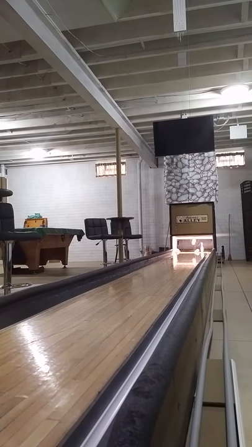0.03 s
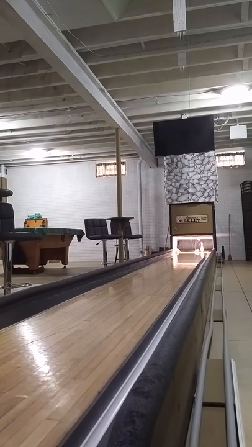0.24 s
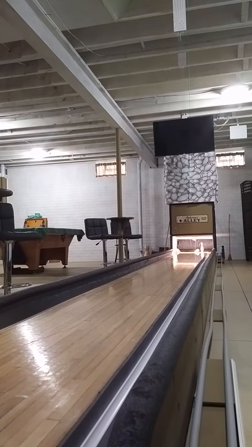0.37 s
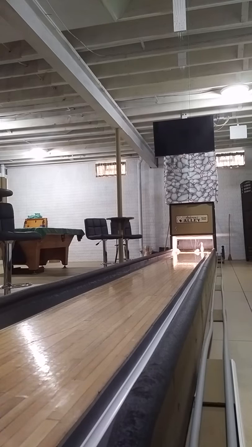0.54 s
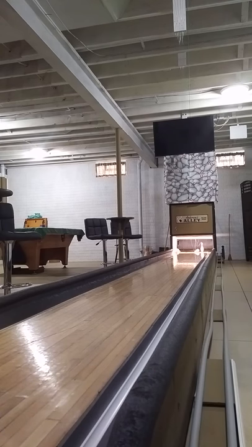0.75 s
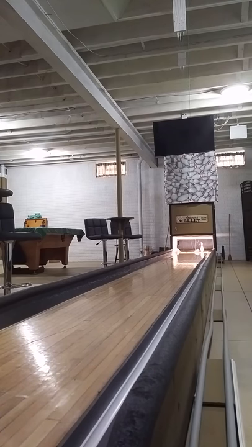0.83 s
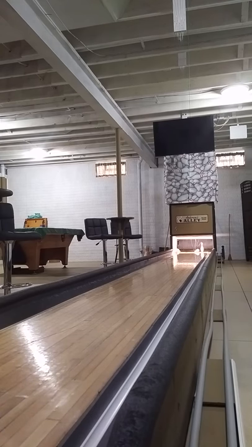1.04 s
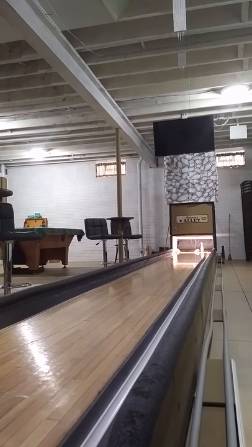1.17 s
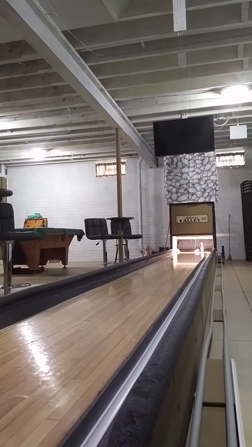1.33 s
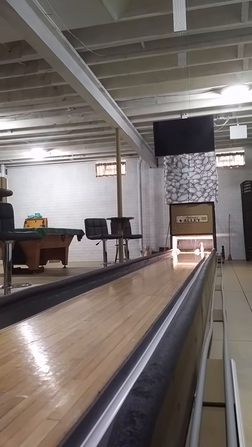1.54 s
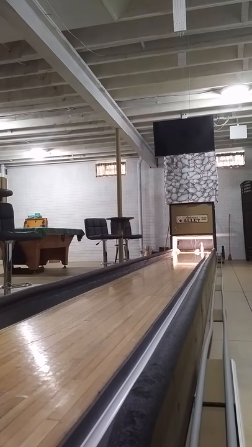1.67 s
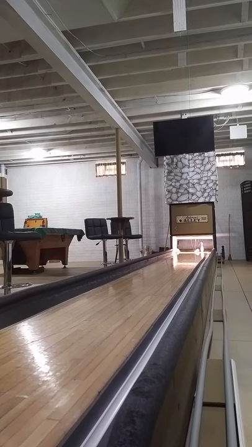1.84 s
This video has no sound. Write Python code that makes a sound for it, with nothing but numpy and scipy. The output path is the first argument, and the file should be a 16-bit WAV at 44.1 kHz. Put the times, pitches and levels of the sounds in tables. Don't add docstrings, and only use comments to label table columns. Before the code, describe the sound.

Wooden bowling pins clatter and thud on a hollow deck at the far end of a basement lane

```python
import sys
import numpy as np
from scipy import signal
from scipy.fft import rfft, irfft
from scipy.io import wavfile
from scipy.ndimage import uniform_filter1d

SR = 44100
rng = np.random.default_rng(int(sys.argv[2]) if len(sys.argv) > 2 else 0)


def attenuation_scalar(level_db):
    decades = np.asarray(level_db, float) / 20
    return 10 ** decades


def generate_wav(signal):
    frames = np.transpose(np.atleast_2d(signal))
    scaled = np.clip(frames, -1, 1) * 32767
    pcm = np.round(scaled).astype(np.int16)
    wavfile.write(sys.argv[1], SR, pcm)


N = 83790


def read(points, hz):
    f, value = np.transpose(points)
    return np.interp(np.log(hz + 1), np.log(f + 1), value)


def evened(x):
    return x / np.sqrt(np.mean(x ** 2) + 1e-30)


def resonate(x, hz, width_hz):
    r = np.exp(-np.pi * abs(width_hz) / SR)
    feedback = [1, -2 * r * np.cos(2 * np.pi * hz / SR), r * r]
    return signal.lfilter([(1 - r * r) / 2, 0, (r * r - 1) / 2], feedback, x)


def causal(log_gain):
    return np.exp(log_gain - 1j * signal.hilbert(log_gain).imag)


def body(colour, modes=()):
    ring_db = 3
    low_skirt, high_skirt = (colour[0][0] / 4, -100), (colour[-1][0] * 4, -100)
    points = [low_skirt] + list(colour) + [high_skirt]
    log_gain = np.log(attenuation_scalar(read(points, abs(np.fft.fftfreq(16384, 1 / SR)))))
    fade = np.cos(np.linspace(0, np.pi / 2, 8192))
    thump = np.fft.ifft(causal(log_gain)).real[:8192] * fade ** 2
    thump = np.pad(thump, (0, 16384))
    taps = thump + sum(attenuation_scalar(db + ring_db) * resonate(thump, hz, width) for hz, width, db in modes)
    taps = taps * np.cos(np.linspace(0, np.pi / 2, len(taps)))
    return taps / np.linalg.norm(taps)


def blows(start_s, level_db, clatter_s):
    rebound_energy = 0.12
    out, t = np.zeros(N + 4000), np.arange(4000) / SR
    for s, db in zip(start_s, level_db):
        burst = rng.standard_normal(len(t)) * np.exp(-t / clatter_s)
        burst *= rng.random(len(t)) < 0.1
        burst *= np.sqrt(rebound_energy) / np.linalg.norm(burst)
        burst[0] = 1
        out[round(s * SR):][:len(t)] += attenuation_scalar(db) * burst
    return out[:N]


def floor():
    # hz, level_db
    air_colour = [(30, -46), (55, 2.5), (300, 3.5), (1200, -8.5), (2900, -14), (8000, -23.5), (12000, -21),
                  (15500, -20.5)]
    # hz, level_db
    old_colour = [(150, -27), (300, -8), (2000, -3), (4500, -12.5), (9000, -24)]
    hz, t = np.fft.rfftfreq(N, 1 / SR), np.arange(N) / SR

    def coloured(points):
        return evened(irfft(rfft(rng.standard_normal(N)) * attenuation_scalar(read(points, hz)), N))

    air = attenuation_scalar(-63.5) * coloured(air_colour)
    old = attenuation_scalar(-66.5 - 28 * t) * coloured(old_colour)
    whine = attenuation_scalar(-78.5) * np.sqrt(2) * np.sin(2 * np.pi * 13038 * t)
    quiet = air + old + whine
    return quiet + attenuation_scalar(10.5) * resonate(quiet, 6320, 1000)


def room():
    # hz, t60_s
    fall = [(60, 0.74), (160, 0.81), (420, 0.61), (1100, 0.73), (2900, 0.44), (7000, 0.32), (13000, 0.18)]
    # hz, rise_s
    rise = [(60, 0.011), (300, 0.011), (600, 0.014), (1200, 0.0032), (4000, 0.0089), (12000, 0.0088)]
    length, even_hz, direct_db = SR * 2, 12, -14.5
    noise, hz, t = rfft(rng.standard_normal(length)), np.fft.rfftfreq(length, 1 / SR), np.arange(length) / SR
    tail = np.zeros(length)
    for centre in 31.25 * 2. ** np.arange(10):
        band = irfft(noise * np.maximum(1 - abs(np.log2((hz + 1) / centre)), 0))
        shape = (1 - np.exp(-t / abs(read(rise, centre)))) * attenuation_scalar(-60 * t / read(fall, centre))
        tail += band * shape / np.linalg.norm(shape)
    spectrum = np.fft.fft(tail)
    power = uniform_filter1d(abs(spectrum) ** 2, size=even_hz * 2, mode="wrap")
    out = np.fft.ifft(spectrum * causal(-np.log(power + 1e-9) / 2)).real
    out[0] += attenuation_scalar(direct_db)
    return out


def down_the_lane(force, taps):
    sound = signal.fftconvolve(force, taps)[:N]
    return signal.fftconvolve(sound, room())[:N]


def deck(roll):
    # start_s, thud_db, boom_db, slap_db
    landings = [(0.136, -44.5, -54, -53), (0.16, -57, -51, -48), (0.2, -22.5, -33.5, -34.5),
                (0.234, -38, -47, -42), (0.26, -46, -56, -47), (0.353, -41, -63, -51),
                (0.4443, -17, -25, -26), (0.473, -21, -28, -31.5), (0.51, -27, -40, -31.5),
                (0.596, -16.5, -25.5, -33), (0.631, -33, -39, -46), (0.699, -25, -38, -35),
                (0.793, -33, -42, -39.5), (0.864, -27, -34.5, -46), (0.936, -23.5, -31, -38),
                (0.999, -28, -32.5, -37.5), (1.059, -21.5, -41, -42.5), (1.103, -37, -33.5, -41.5),
                (1.141, -23, -47, -41.5), (1.206, -21.5, -31, -35.5), (1.282, -25.5, -35, -33.5),
                (1.328, -41, -47, -36), (1.389, -46, -53, -51.5), (1.46, -42, -47, -51),
                (1.541, -47, -49, -53.5), (1.845, -46.5, -69, -61)]
    # hz, level_db
    thud_colour = [(110, -41), (170, -17.5), (210, -1.5), (310, 4), (400, 3), (700, -27.5)]
    boom_colour = [(40, -13), (80, 4.5), (130, 9.5), (160, 5), (230, -35)]
    slap_colour = [(250, -31), (430, -2.5), (650, 4.5), (850, -6.5), (1600, -37.5)]
    # pitch_hz, width_hz, level_db
    panel_modes = [(217.6, 50, 5), (252, 38, -3.5), (305.2, 13.3, 3.5), (340, 38, -5), (375, 25, -3.5)]
    hollow_modes = [(96, 28, -16), (121, 3.7, -5), (137, 26, -12.5)]
    board_modes = [(463.4, 32, 7.5), (526, 19, 3), (629, 19.5, -6.5), (754, 19, -1.5)]
    start_s, thud_db, boom_db, slap_db = np.transpose(landings)
    thud = attenuation_scalar(22) * blows(start_s, thud_db, clatter_s=0.0057) + roll
    boom = attenuation_scalar(24.5) * blows(start_s, boom_db, clatter_s=0.0028) + attenuation_scalar(-13) * roll
    slap = attenuation_scalar(30) * blows(start_s, slap_db, clatter_s=0.0023) + attenuation_scalar(-3.5) * roll
    return (down_the_lane(thud, body(thud_colour, panel_modes))
            + down_the_lane(boom, body(boom_colour, hollow_modes))
            + down_the_lane(slap, body(slap_colour, board_modes)))


def pins(roll):
    # start_s, crack_db, knock_db
    clacks = [(0.14, -79, -47.5), (0.152, -68, -48.5), (0.1623, -70, -66), (0.2011, -28, -28),
              (0.222, -34.5, -34.5), (0.245, -38.5, -37), (0.4452, -26.5, -28), (0.474, -30.5, -27.5),
              (0.498, -38, -32), (0.5462, -24.5, -27), (0.5742, -27.5, -30), (0.599, -31, -28.5),
              (0.6491, -36, -35.5), (0.7401, -38, -41.5), (0.8196, -46.5, -75), (0.8994, -46, -46),
              (1.0248, -41.5, -42.5), (1.116, -49, -44), (1.196, -43, -39), (1.2697, -41, -34.5),
              (1.2874, -33, -34), (1.3498, -46, -55), (1.3891, -60, -42)]
    # hz, level_db
    crack_colour = [(900, -34), (1800, -8), (2560, -7.5), (5160, -9), (6300, -4.5), (7600, -17),
                    (10000, -29), (15500, -51)]
    knock_colour = [(250, -17.5), (600, -10.5), (1000, -3), (1600, -9), (2500, -20.5), (5000, -26.5)]
    # pitch_hz, width_hz, level_db
    pin_modes = [(826, 12.5, 2.5), (997, 6.7, -10.5), (1080.4, 55, -6), (1476, 6.7, -24), (1715, 22, -12.5),
                 (2030, 33, 1.5)]
    clatter_s = 0.0089
    start_s, crack_db, knock_db = np.transpose(clacks)
    crack = attenuation_scalar(22) * blows(start_s, crack_db, clatter_s) + attenuation_scalar(-11.5) * roll
    knock = attenuation_scalar(26.5) * blows(start_s, knock_db, clatter_s) + attenuation_scalar(-7) * roll
    return down_the_lane(crack, body(crack_colour)) + down_the_lane(knock, body(knock_colour, pin_modes))


def ticks():
    # start_s, level_db, centre_hz, width_hz
    near = [(0.548, -8.5, 1550, 500), (1.627, -57, 4040, 4910), (1.633, -47, 2805, 3000),
            (1.636, -54, 5500, 4000), (1.643, -58, 3500, 4000), (1.746, -53, 12540, 4940),
            (1.751, -52, 14100, 5310), (1.75, -52, 6470, 2500), (1.795, -49, 2537, 1210),
            (0.446, -39, 9400, 4000), (0.452, -24, 6000, 2000), (0.46, -41, 10000, 4000),
            (0.143, -37, 1750, 400), (0.165, -38, 1400, 600), (1.3, -30, 900, 500), (1.32, -36, 3000, 1990)]
    out, t = np.zeros(N + 2000), np.arange(2000) / SR
    for s, db, hz, width in near:
        puff = rng.standard_normal(len(t)) * np.exp(-t / 0.0033)
        puff = resonate(resonate(puff, hz, width), hz, width)
        out[round(s * SR):][:len(t)] += attenuation_scalar(db) * puff
    return out[:N]


def panel():
    # start_s, level_db
    strength = [(0.2, -45), (0.242, -26), (0.366, -42.5), (0.446, -42), (0.496, -26.5), (0.567, -38),
                (0.634, -23), (0.727, -30), (0.764, -45.5), (0.817, -28), (0.868, -61), (0.948, -27.5),
                (0.974, -47.5), (1.17, -31), (1.246, -40.5), (1.345, -25), (1.398, -51), (1.5, -63)]
    pitch_hz, pitch_waver_hz, level_db, level_waver_db = 304.1, 8.68, -4.5, -2.5
    s, db = np.transpose(strength)
    t = np.arange(N) / SR
    slow = signal.butter(2, [8, 40], "band", fs=SR, output="sos")
    waver = signal.sosfiltfilt(slow, rng.standard_normal((2, N)))
    course_db = np.interp(t, [s[0] - 0.004, *s, s[-1] + 0.25], [-90, *db, -80], -120, -120)
    level = attenuation_scalar(course_db + level_db + level_waver_db * evened(waver[0]))
    cycles = np.cumsum(pitch_hz + pitch_waver_hz * evened(waver[1])) / SR
    return np.sqrt(2) * level * np.sin(2 * np.pi * cycles)


def rings():
    # start_s, pitch_hz, level_db
    tones = [(0.202, 1087, -36.5), (.202, 709, -39), (.225, 150.7, -39), (.23, 470.3, -38),
             (.265, 167, -44), (.203, 1360, -42), (.209, 1000, -37), (.209, 842, -46.5), (.239, 625, -36.5),
             (.245, 1425, -41), (.297, 1065, -47), (.3, 653, -43.5), (.35, 621, -48.5), (0.466, 143, -34),
             (.465, 1132, -40), (.472, 340, -27.5), (0.506, 340, -36), (.473, 751, -32), (.479, 860, -38),
             (.487, 1357, -42), (.499, 460, -32.5), (.513, 567, -35.5), (.549, 374.5, -30),
             (.559, 845, -45), (.579, 710, -39.5), (.583, 2030, -39), (.591, 1013, -43), (.605, 818, -50),
             (.63, 211.8, -33), (.65, 636, -47), (0.686, 115, -46), (.748, 342, -37.5), (.78, 136, -40.5),
             (0.849, 71.03, -47), (.856, 245.4, -35.5), (.91, 519, -43.5), (0.921, 88, -46.5),
             (1.07, 1380, -54.5), (1.018, 340, -35.5), (1.064, 228, -34.5), (1.277, 463, -34),
             (1.285, 1070, -39), (1.295, 718, -39.5), (1.31, 118.2, -36.5), (1.333, 472.6, -38),
             (1.333, 672, -39), (1.385, 629, -41), (1.46, 353, -50), (1.54, 639, -52.5), (1.35, 104, -45),
             (1.375, 1156, -45.5), (1.535, 135, -52), (1.6, 1125, -64), (1.634, 296, -54.5),
             (1.7, 118, -59), (1.79, 118.6, -63), (1.845, 311, -62.5), (1.87, 400, -67)]
    swell_s, swell_cycles = 0.011, 0.39
    out, t = np.zeros(N + 8000), np.arange(8000) / SR
    for s, hz, db in tones:
        u = t / (swell_s + swell_cycles / hz)
        swell = u * np.exp(1 - u)
        out[round(s * SR):][:len(t)] += np.sqrt(2) * attenuation_scalar(db) * swell * np.sin(2 * np.pi * hz * t)
    return out[:N]


def motor():
    # pitch_hz, level_db
    lines = [(60, -58), (119.5, -65), (238, -64)]
    on_s, off_s, rise_s, fall_s = 0.3, 1.83, 0.08, 0.03
    t = np.arange(N) / SR
    on = np.clip(np.minimum((t - on_s) / rise_s, (off_s - t) / fall_s), 0, 1)
    throb_db = 2.3 * np.sin(2 * np.pi * 6.5 * t)
    return on * sum(np.sqrt(2) * attenuation_scalar(db + throb_db) * np.sin(2 * np.pi * hz * t) for hz, db in lines)


def slab():
    # start_s, level_db
    shudders = [(.33, -53), (.47, -47), (.62, -49), (.76, -51), (.86, -72), (1.0, -71), (1.08, -60),
                (1.2, -48.5), (1.34, -51), (1.47, -57), (1.56, -64), (1.66, -75), (1.74, -75)]
    # hz, level_db
    slab_colour = [(25, -43), (45, -7), (62, 15), (80, 12), (130, -70)]
    start_s, level_db = np.transpose(shudders)
    force = attenuation_scalar(37.5) * blows(start_s, level_db, clatter_s=0.00034)
    return down_the_lane(force, body(slab_colour))


def rolling():
    # start_s, level_db
    course = [
        (.85, -52.5),
        (0.932, -45),
        (1.1, -47.5),
        (1.2, -39),
        (1.26, -38.5),
        (1.33, -60),
        (1.371, -47),
        (1.4, -51.5),
        (1.65, -73),
    ]
    bumps_per_s, spread_db = 250, 1
    s, db = np.transpose(course)
    size = attenuation_scalar(spread_db * np.minimum(rng.exponential(1, N), 4)) * rng.choice([-1., 1.], N)
    level = attenuation_scalar(np.interp(np.arange(N) / SR, s, db, -120, -120))
    bump = rng.random(N) < bumps_per_s / SR
    return level * size * bump * np.sqrt(SR / bumps_per_s)


def scene():
    roll = rolling()
    struck = deck(roll) + pins(roll) + slab()
    ringing = panel() + rings()
    return (floor() + struck + ticks() + ringing + motor())[None]


def top_cut(x):
    return signal.sosfilt(signal.butter(12, 15690, fs=SR, output="sos"), x)


def record(dry):
    knee, edge_hz, offset = 0.84, 15690, -0.0004
    limited = knee * np.tanh(dry / knee)
    edge = signal.firwin(511, edge_hz, window=("kaiser", 9), fs=SR)[None]
    return top_cut(signal.oaconvolve(limited, edge, "same") + offset)


dry = scene()
out = record(dry)
generate_wav(out)
```